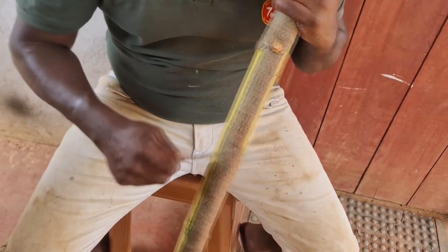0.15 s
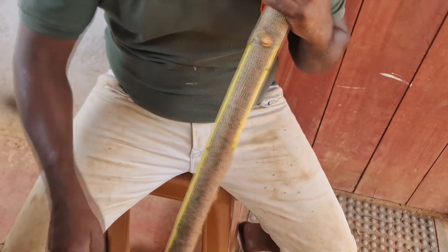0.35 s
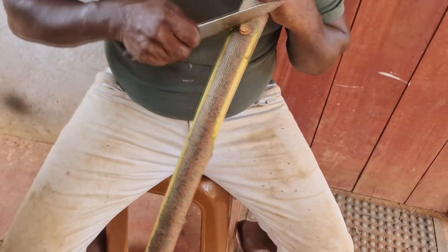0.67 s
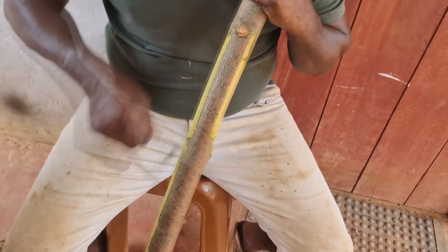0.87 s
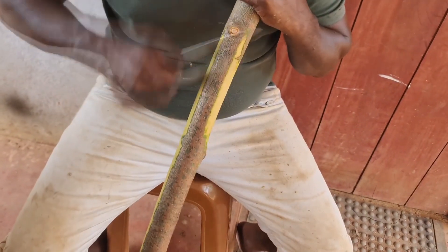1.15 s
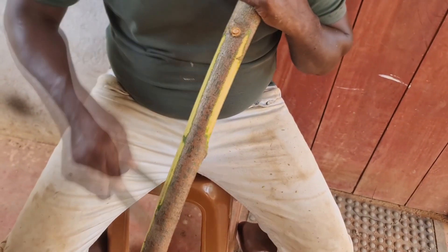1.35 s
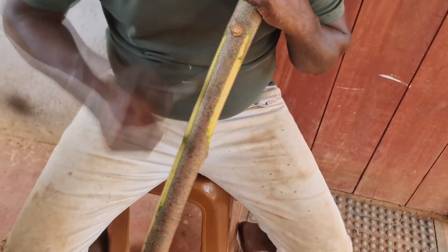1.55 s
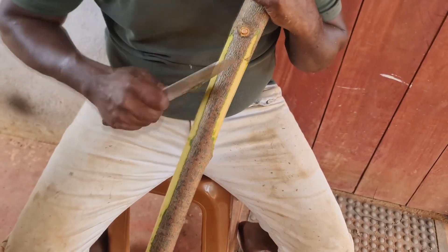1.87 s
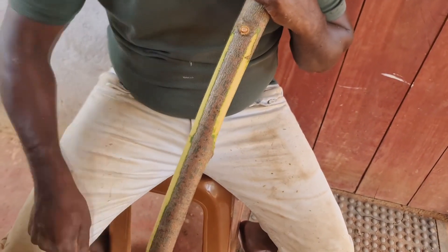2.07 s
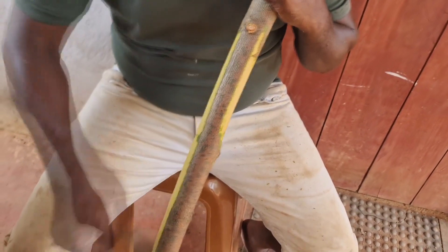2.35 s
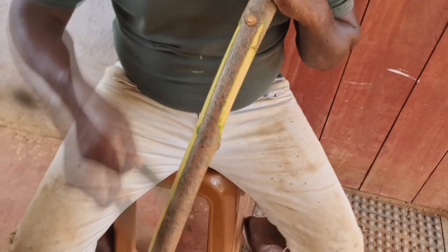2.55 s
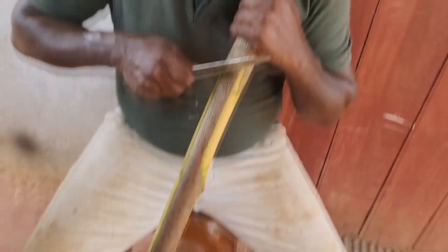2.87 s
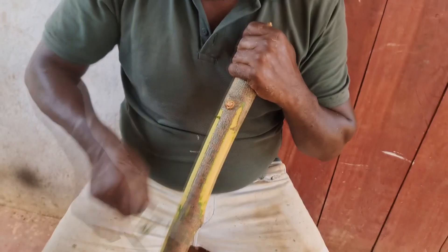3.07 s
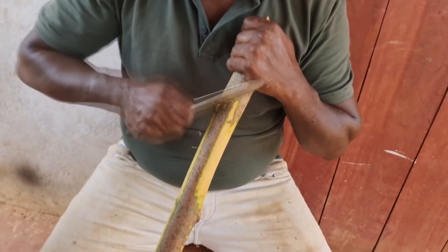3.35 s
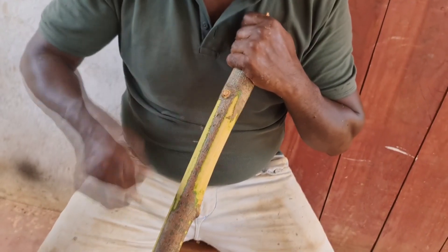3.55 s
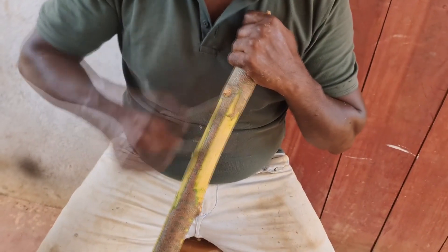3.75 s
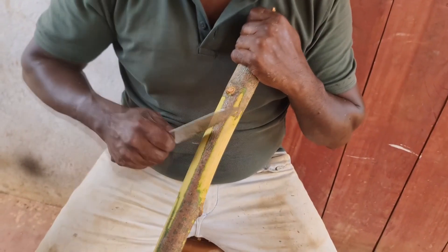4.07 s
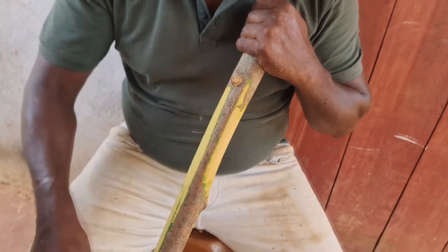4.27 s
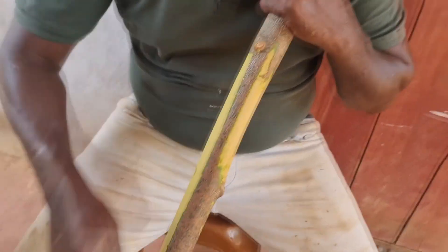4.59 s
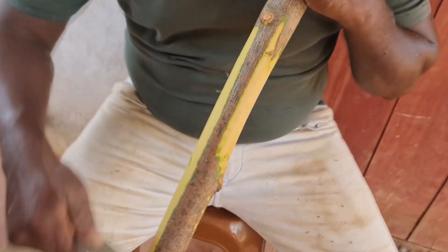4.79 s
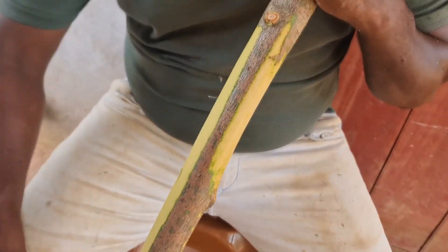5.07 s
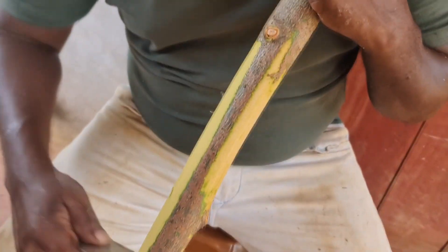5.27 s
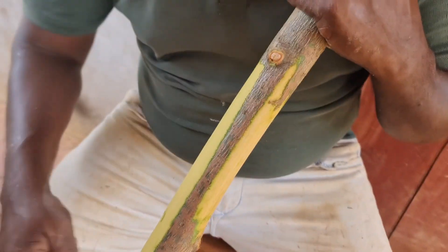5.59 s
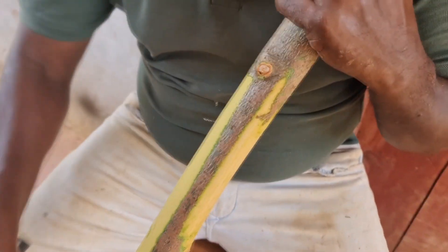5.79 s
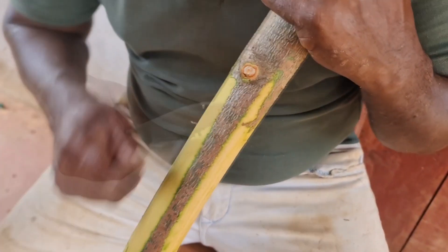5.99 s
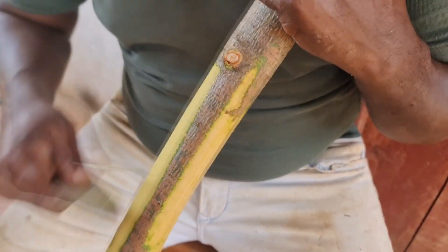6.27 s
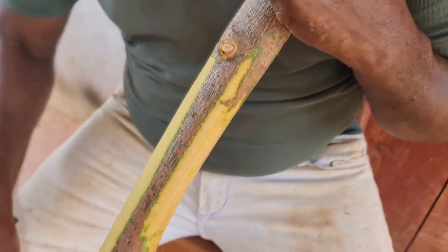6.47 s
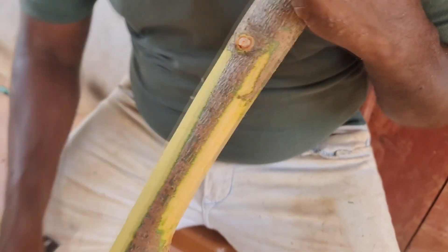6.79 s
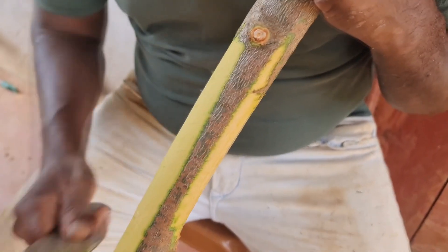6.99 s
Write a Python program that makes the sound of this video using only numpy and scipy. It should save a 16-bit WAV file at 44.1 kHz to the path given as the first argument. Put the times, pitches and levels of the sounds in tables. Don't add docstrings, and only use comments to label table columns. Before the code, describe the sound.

A knife blade rasps bark off a green branch in quick, dry, evenly paced strokes, with sharp fibre cracks and faint breeze rumble.

```python
import sys
import numpy as np
from scipy import signal
from scipy.fft import rfft, irfft
from scipy.io import wavfile
from scipy.ndimage import uniform_filter1d

SR = 44100
rng = np.random.default_rng(int(sys.argv[2]) if len(sys.argv) > 2 else 0)


def volts(x):
    e = np.asarray(x, float) / 20
    return 10 ** e


def dump(signal):
    limited = np.clip(np.atleast_2d(signal).T, -1, 1)
    pcm = np.round(limited * 32767).astype(np.int16)
    wavfile.write(sys.argv[1], SR, pcm)


N = 314433
TIME = np.arange(N) / SR

# start of the slide in seconds, then seconds after it of the bite into bark,
# the deepest cut and the lift.
STROKES = [(.074, .021, 0.092, .107), (0.41, 0.043, 0.1, 0.1), (.985, 0.026, .095, 0.13),
           (1.358, 0.036, 0.15, 0.14), (1.743, 0.025, 0.13, 0.13), (2.12, 0.042, 0.17, 0.15),
           (2.501, 0.01, 0.091, 0.12), (3.162, 0.051, 0.1, 0.14), (3.586, 0.024, 0.076, .12),
           (3.94, 0.024, 0.17, 0.14), (4.308, 0.045, .12, .15), (4.726, 0.053, 0.13, .15),
           (5.135, 0.035, 0.089, 0.12), (5.511, 0.023, 0.096, 0.11), (5.871, 0.0098, 0.078, 0.089),
           (6.201, 0.028, 0.069, 0.12), (6.548, 0.018, 0.084, .09), (6.878, .057, 0.18, 0.16)]
# rasp at the bite in dB, rasp at the deepest cut in dB,
# wood body there in dB re rasp, fibre hiss at full speed in dB.
STROKE_FORCES = [(-33.5, -30.5, -10.5, -29.5), (-33.5, -28, -7.5, -26), (-27.5, -23.5, -10.5, -26.5),
                 (-28, -24.5, -11.5, -26.5), (-35, -28, -15, -28), (-35, -30.5, -9, -29),
                 (-38.5, -26.5, -10.5, -29.5), (-29.5, -22.5, -7.5, -27), (-30, -21, -9.5, -28.5),
                 (-35.5, -32.5, -12, -30), (-36, -21, -9, -27), (-34.5, -24, -4.5, -26.5),
                 (-33.5, -23, -6, -27), (-34.5, -31.5, -8.5, -29.5), (-34, -32, -11, -32),
                 (-39, -30.5, -14, -30.5), (-34, -31, -13.5, -27), (-36, -29, -11, -27.5)]
# centre in seconds, half length in seconds,
# rasp in dB, wood body in dB re rasp.
BRUSHES = [(0.488, 0.015, -26, -9.5), (1.869, 0.026, -29, -8), (2.25, 0.026, -27, -10.5),
           (4.049, 0.027, -23.5, -11.5), (4.842, .02, -21, -9), (6.275, 0.029, -37.5, -6),
           (7.036, 0.019, -29, -11.5), (0.044, 0.036, -62, 16.5), (.69, .05, -71, 7.5),
           (0.873, 0.07, -61.5, 6.5), (0.98, 0.055, -49, -7), (1.225, .06, -45.5, -3.5),
           (1.314, 0.11, -45.5, -7), (3.208, 0.043, -44, 8.5), (1.703, 0.088, -51.5, -9.5),
           (2.783, 0.027, -60, -4), (6.037, 0.0071, -59, -23), (3.557, 0.02, -57.5, -3),
           (3.93, .02, -58, 2), (4.217, 0.045, -59.5, -11), (6.076, 0.015, -54.5, -26),
           (6.84, 0.082, -57, -17), (7.12, 0.026, -67, -10)]
# frequency in Hz, density in dB per Hz.
BARK_TONE = [(180, -100), (300, -65), (366, -26), (439, -36.5), (696, -7.5), (937, -5.5), (1070, -2),
             (2320, -4.5), (3180, -2.5), (8420, -9), (13400, -8), (14800, -15), (15500, -71)]
# frequency in Hz, width in Hz, left in dB, right in dB.
RESONANCES = [(1060, 180, 3, 1), (1510, 220, 1, 5), (1900, 220, 3, 1), (2120, 200, 0, 4), (3330, 450, 4, 3),
              (3650, 300, 0, 2.5), (4170, 300, 0, 2.5), (4400, 300, 1.5, 0), (6000, 900, 2, 2),
              (9500, 900, -2, -4), (11600, 900, 2, 6), (13250, 700, 6, 2)]
# time in seconds, left minus right in dB.
SIDEWAYS = [(0.0, -2.5), (1.27, -4.5), (2.18, -2), (3.6, -3.5), (4.65, -3), (5.6, -2.5), (6.13, -1),
            (7.13, -2)]
# time in seconds, low hum in dB.
NEARNESS = [(0, -0.5), (2.5, -1), (5.0, -2), (5.5, 2.5), (7.13, 3.5)]
# time in seconds, peak in dB, knock in Hz, tick in dB re knock,
# left minus right in dB.
LANDINGS = [(0.026, -44, 1040, -14, -11), (0.41, -40, 590, 6, 2), (0.841, -49.5, 400, 1, 0),
            (0.865, -51, 401, -21, 4), (0.882, -41.5, 814, -8, -6), (0.905, -54, 1010, -14, -12),
            (1.354, -43, 1030, 9, 12), (1.717, -44.5, 566, 1, 3), (2.121, -41, 690, -10, 5),
            (2.479, -40.5, 1090, 6.5, -1), (3.004, -60.5, 890, -16, -8), (3.591, -46, 630, 13, 13),
            (3.941, -44.5, 740, 0, 0), (4.306, -38.5, 935, -4, 4), (4.725, -40.5, 690, 0, 3),
            (5.135, -36.5, 584, 8.5, -1), (5.503, -38, 890, 9, 1), (5.852, -44.5, 1060, 10, 10),
            (6.203, -41.5, 580, -3, 0), (6.545, -35.5, 620, 5, 2), (6.879, -44, 600, -16, 3)]
# time in seconds, peak in dB, ring in Hz.
CHIPS = [(0.062, -30, 2480), (0.161, -21, 3400), (2.274, -33, 2980), (2.6244, -18, 3700),
         (3.0714, -48, 2590), (3.549, -41, 3450), (3.6682, -29, 3530), (3.8294, -57, 3140),
         (3.913, -39, 3520), (4.2916, -48, 2530), (5.5997, -14, 4800), (5.8528, -20.5, 2320),
         (5.957, -21, 3650), (6.034, -44, 3330), (6.0696, -42, 3580), (6.083, -46, 2600),
         (6.1493, -37.5, 1870), (6.5802, -16, 3570), (6.604, -27, 3400)]
# time in seconds, thump in dB.
GUSTS = [(0, -50.5), (.3, -63.5), (.75, -64.5), (1.4, -61), (2.3, -61), (2.62, -67.5), (3.0, -60.5),
         (3.4, -58), (3.7, -56), (4.0, -61), (4.25, -51), (4.8, -59), (5.6, -58), (5.8, -45.5), (6.05, -47),
         (6.4, -49), (6.8, -56), (7.13, -48.5)]
# time in seconds, level in dB over the gust.
PUFFS = [(.52, 16.5), (.87, 11.5), (1.13, 5.5), (1.53, 6), (3.18, 7), (3.55, 11), (5.76, 8.5), (5.9, 13.5),
         (6.14, 0), (6.5, 6.5)]
# frequency in Hz, density in dB per Hz.
BREEZE_TONE = [(15, -24), (35, 1.5), (70, 9), (100, 0), (160, -20.5), (400, -53.5)]
# frequency in Hz, density in dB per Hz.
YARD_TONE = [(71, -36.5), (120, -5), (199, -4), (275, -16.5), (365, -3.5), (403, -11), (785, -17.5),
             (1870, -19), (3430, -17), (3950, -30.5), (7400, -21.5), (15000, -50.5)]


def level(x, db):
    return x * volts(db) / np.sqrt(np.mean(x ** 2))


def follow(curve):
    return np.interp(TIME, *np.transpose(curve))


def colour(x, points, rings=(), size=4096):
    hz = np.maximum(np.arange(size // 2 + 1) * SR / size, 1)
    point_hz, point_db = np.transpose(points)
    db = np.interp(np.log(hz), np.log(point_hz), point_db)
    for mid_hz, width, top_db in rings:
        db = db + top_db / (1 + (2 * (hz - mid_hz) / width) ** 2)
    cepstrum = irfft(db * np.log(10) / 20)
    cepstrum[1:size // 2] *= 2
    cepstrum[size // 2 + 1:] = 0
    impulse = irfft(np.exp(rfft(cepstrum)))
    return signal.fftconvolve(x, np.atleast_2d(impulse), axes=1)[:, :N]


def band(x, low_hz, high_hz):
    return signal.sosfilt(signal.butter(3, [low_hz, high_hz], "band", fs=SR, output="sos"), x)


def walk(rate):
    hold = max(int(SR / rate), 1)
    steps = np.repeat(rng.standard_normal(N // hold + 1), hold)[:N]
    return 1.3 * uniform_filter1d(uniform_filter1d(steps, hold), hold)


def pair(shared, own, likeness):
    return np.sqrt(likeness) * shared + np.sqrt(1 - likeness) * own


def panned(pan_db):
    return volts(np.array([pan_db, -pan_db]) / 2)


def frames(x, size, shift=0):
    plan = dict(fs=SR, window=signal.windows.cosine(size), nperseg=size)
    hz, s, z = signal.stft(np.pad(x, ((0, 0), (shift, 0))), **plan)
    return hz, s - shift / SR, z, lambda z: signal.istft(z, **plan)[1][:, shift:shift + N]


def scrape():
    rasp_db, body_db, hiss_db = blade_levels()
    chatter_db = 1.0 * walk(350) + 0.71 * walk(90)
    snaps = fibres(per_s=14000, scatter_db=-0.3) * volts(chatter_db)
    starts = np.array([0] + [row[0] for row in STROKES])
    travel = np.minimum(TIME - starts[np.searchsorted(starts, TIME, "right") - 1], 0.2)
    late = np.interp(np.arange(N) - 10.5 - 40 * travel, np.arange(N), snaps[0])
    shared = np.array([snaps[0], level(late, 0) * np.std(snaps[0])])
    both = pair(shared, snaps[1:], likeness=0.44)
    ports = []
    for k in range(2):
        rings = [(hz, width, db[k]) for hz, width, *db in RESONANCES]
        ports.append(colour(both[k:k + 1], BARK_TONE, rings))
    wood = shifting_rings(np.vstack(ports), 3150 + 1500 * travel, ring_db=3.0, width=350, patchy_db=2.9)
    registers = ((400, 1800, body_db), (1800, 6000, 0), (6000, 16000, hiss_db))
    out = sum(level(band(wood, low_hz, high_hz), 2.76) * volts(rasp_db + db) for low_hz, high_hz, db in registers)
    hum_db = 0.57 * (rasp_db + body_db) + follow(NEARNESS)
    hum = level(band(snaps[0], 220, 750), -28.5) * volts(hum_db)
    return (out + hum) * panned(3.2 + follow(SIDEWAYS))


def blade_levels():
    return_hiss_db = -13.5
    out = volts(-73 + np.array([[0], [-4.5], [return_hiss_db]]) + 1.18 * walk(12)) ** 2
    start_under_db, ease_db_per_s = 14, 113.5
    release_db_per_s, trail_db, trail_db_per_s = 633, -17, 209
    for (s, bite, deep, lift), (bite_db, deep_db, wood_db, hiss_db) in zip(STROKES, STROKE_FORCES):
        span = slice(int(s * SR), int(s * SR) + SR // 2)
        t = TIME[span] - s
        after = np.maximum(t - lift, 0)
        release = volts(-release_db_per_s * after) ** 2 + volts(trail_db - trail_db_per_s * after) ** 2
        stages = [0, bite, max(deep, bite), max(lift, deep)]
        lift_db = deep_db - ease_db_per_s * (lift - deep)
        rasp = np.interp(t, stages, [bite_db - start_under_db, bite_db, deep_db, lift_db])
        wood = rasp + np.interp(t, stages, [-2, -13.5, wood_db, wood_db - 1.5])
        fast = min(bite + 0.055, lift)
        hiss_stages = [0, bite, fast, lift + 1 / SR, lift + 0.037]
        hiss = hiss_db + np.interp(t, hiss_stages, [-23, -5.5, 0, -2.5, -3.8])
        onset = np.clip(t / 0.0017, 0, 1) ** 2
        out[:, span] += volts(np.array([rasp, wood, hiss])) ** 2 * release * onset
        settling = -60.5 - 47 * after + np.array([[0], [-7], [return_hiss_db]])
        out[:, span] += volts(settling) ** 2 * (t > bite)
    for s, half, db, wood_db in BRUSHES:
        span = slice(max(int((s - half) * SR), 0), int((s + half) * SR))
        swell = np.cos(np.pi / 2 * (TIME[span] - s) / half) ** 2
        out[:, span] += volts(db + np.array([[0], [wood_db], [-9.5]])) ** 2 * swell
    rasp_db, wood_db, hiss_db = 10 * np.log10(out)
    return rasp_db, wood_db - rasp_db, hiss_db - rasp_db


def fibres(per_s, scatter_db):
    snaps = rng.random((3, N)) < per_s / SR
    return snaps * rng.standard_normal((3, N)) * volts(scatter_db * rng.exponential(size=(3, N)))


def shifting_rings(x, ring_hz, ring_db, width, patchy_db):
    hz, t, z, back = frames(x, size=512)
    ring = ring_db / (1 + (2 * (hz[:, None] - np.interp(t, TIME, ring_hz)) / width) ** 2)
    chance = rng.standard_normal((3,) + z.shape[1:])
    patches = uniform_filter1d(chance[0] + chance[1:], size=3, axis=1)
    patches = uniform_filter1d(patches, size=6, axis=2)
    return back(z * volts(ring + patchy_db * patches / patches.std()))


def taps():
    out, t = np.zeros((2, N + 2000)), np.arange(2000) / SR
    grits = rng.standard_normal((len(LANDINGS), 2, len(t)))
    for (s, db, hz, tick_db, pan_db), grit in zip(LANDINGS, grits):
        knock = np.sin(2 * np.pi * hz * t) * t / 0.00079 * np.exp(1 - t / 0.0007)
        tick = volts(-19) * np.diff(grit, prepend=0) * np.exp(-t / 0.0006)
        crush = volts(-5) * band(grit, 910, 3600) * np.exp(-t / 0.0092)
        hit = knock + volts(tick_db) * (tick + crush)
        start = int((s + 0.0015) * SR)
        out[:, start:start + len(t)] += volts(db + 10) * hit * panned(pan_db)[:, None]
    return out[:, :N]


def chips():
    out, t = np.zeros((2, N + 600)), np.arange(600) / SR
    grits = rng.standard_normal((len(CHIPS), 2, len(t)))
    for (s, db, hz), grit in zip(CHIPS, grits):
        ring = np.sin(2 * np.pi * hz * t) * np.exp(-t / 0.0012)
        splinters = 0.25 * band(grit, 0.5 * hz, 10000) * np.exp(-t / 0.0027)
        start = int(s * SR)
        out[:, start:start + len(t)] += volts(db - 2.5) * (ring + splinters)
    return out[:, :N]


def porch(x, t60_s, wet_db, count=4):
    t = np.arange(int(0.2 * SR)) / SR
    decay = np.exp(-t * np.log(1000) / t60_s) * (t > 0.003)
    washes = band(rng.standard_normal((count, 2, len(t))), 500, 7600) * decay
    washes = washes / np.sqrt(np.sum(washes ** 2) / 2)
    wet = sum(signal.fftconvolve(x * walk(8), wash, axes=1)[:, :N] for wash in washes)
    return x + volts(wet_db) * wet


def breeze():
    air = rng.standard_normal((3, N))
    ports = pair(air[0], air[1:], likeness=0.2)
    thump = level(colour(ports, BREEZE_TONE, size=16384), 2.8)
    puff_s = 0.036
    puffs_db = sum(db * np.exp(-((TIME - s) / puff_s) ** 2) for s, db in PUFFS)
    flutter_db = 2.2 * walk(26) + 1.5 * walk(7)
    return thump * volts(follow(GUSTS) + flutter_db + puffs_db) * panned(4.1 + 1.4 * walk(8.4))


def yard():
    air = colour(rng.standard_normal((3, N)), YARD_TONE)
    bass = band(air, 80, 1200) * volts(4.2 * walk(23))
    treble = band(air, 550, 17000) * volts(2.0 * walk(9.2))
    return level(pair(bass[0], bass[1:], likeness=0.62) + treble[1:], -56.5)


def scene():
    cutting = scrape() + taps() + chips()
    return porch(cutting, t60_s=0.048, wet_db=-8) + breeze() + yard()


def starve_bass(x, under_db, slope_db, scatter_db, count=14):
    hz, t, z, back = frames(x, size=2048, shift=97)
    power = np.abs(z) ** 2
    low = 5 * count
    bands = power[:, :low].reshape(2, count, 5, -1).sum(axis=2)
    treble = power[:, low:].sum(axis=1, keepdims=True)
    limit_db = under_db + slope_db * np.arange(count)[:, None] + scatter_db * rng.standard_normal(bands.shape)
    keep = bands > treble * volts(2 * limit_db)
    gain = np.ones(z.shape)
    gain[:, :low] = np.repeat(keep, 5, axis=1)
    return back(z * gain)


def roll_off(x):
    return signal.sosfilt(signal.butter(12, 15800, fs=SR, output="sos"), x)


def record(dry):
    thinned = starve_bass(dry, under_db=-32, slope_db=0.32, scatter_db=3)
    top_cut = signal.ellip(8, 0.2, 70, 14650, fs=SR, output="sos")
    mix = signal.sosfilt(top_cut, thinned)
    return roll_off(mix)


dry = scene()
out = record(dry)
dump(out)
```